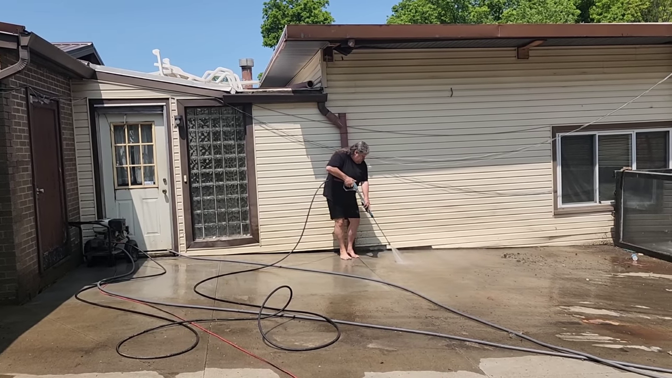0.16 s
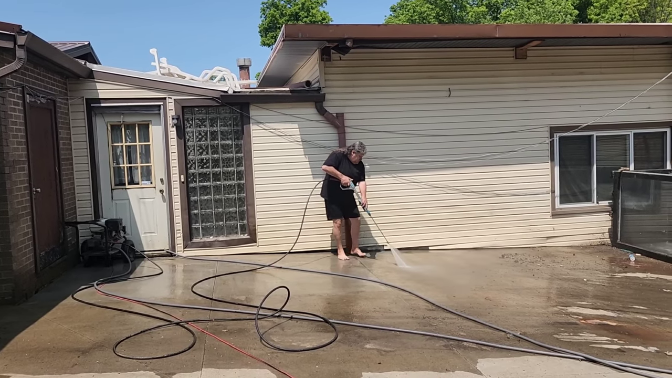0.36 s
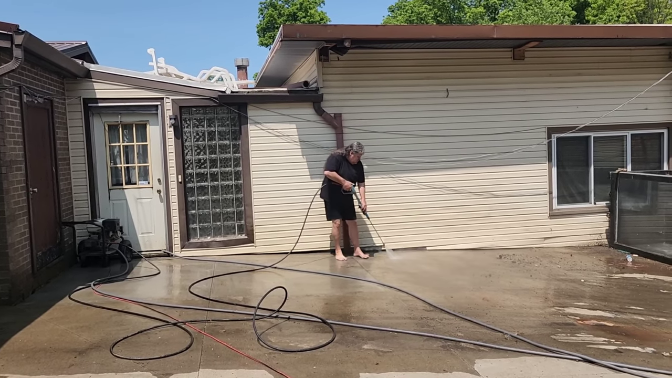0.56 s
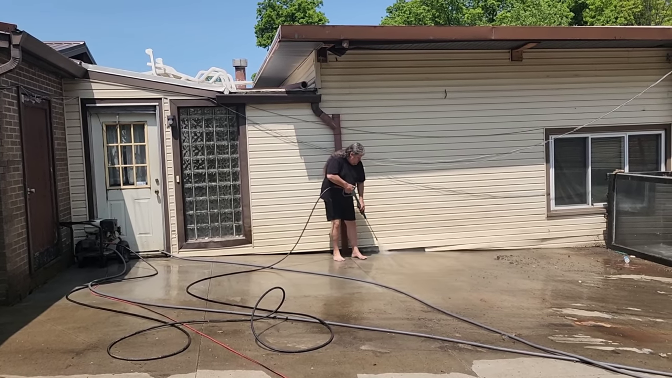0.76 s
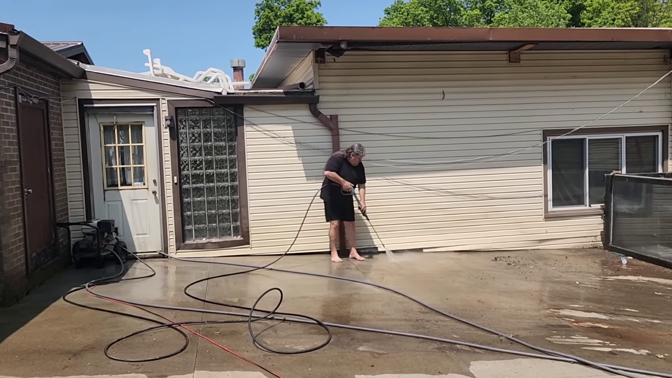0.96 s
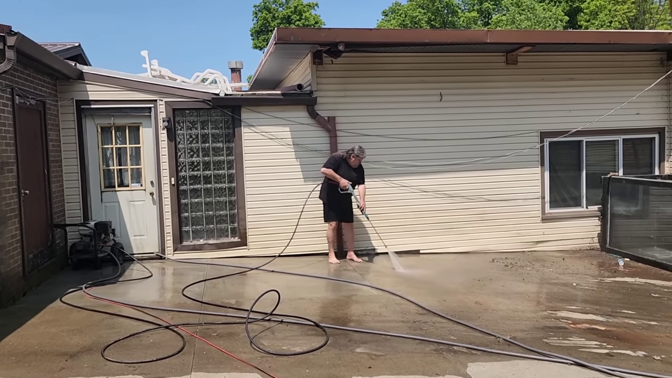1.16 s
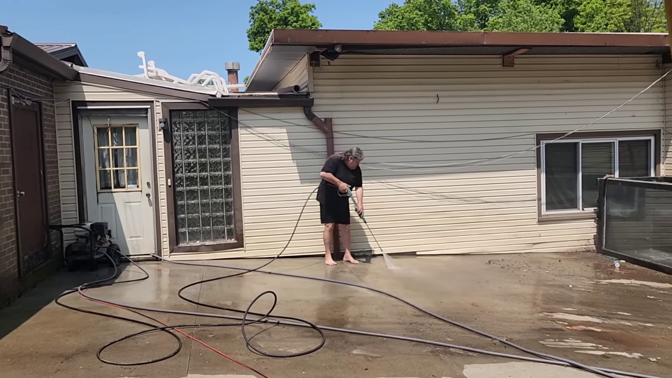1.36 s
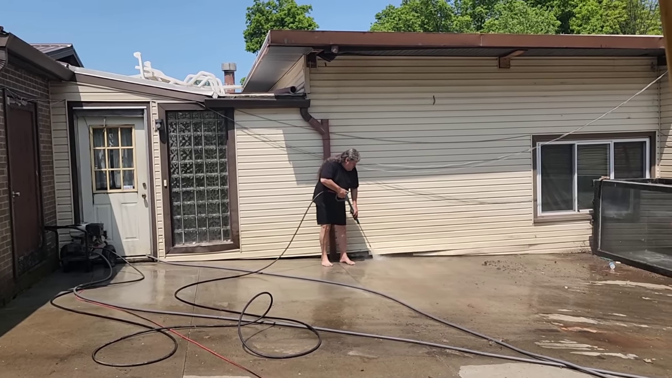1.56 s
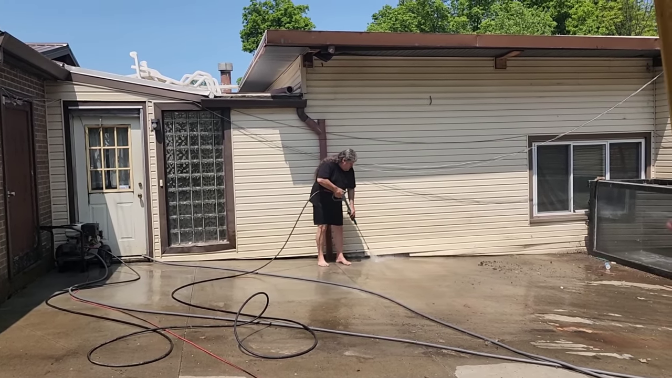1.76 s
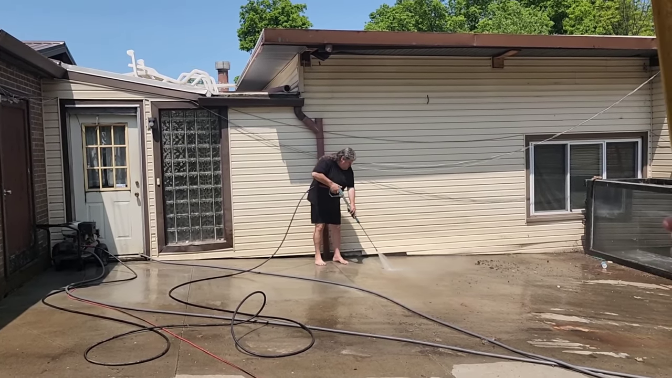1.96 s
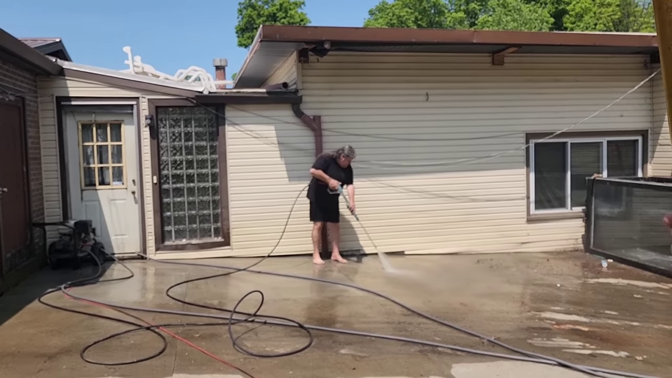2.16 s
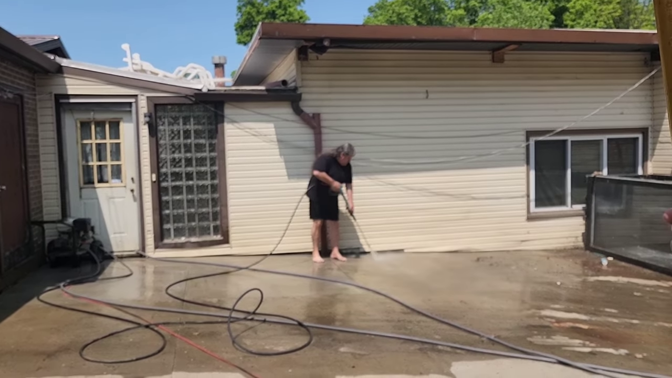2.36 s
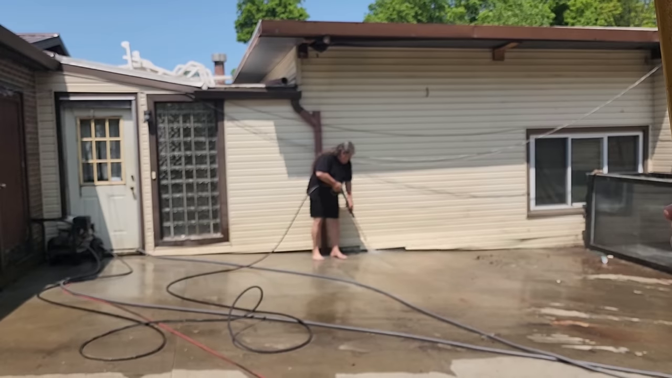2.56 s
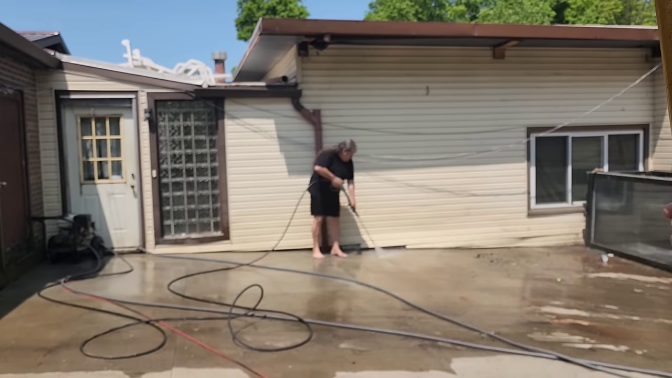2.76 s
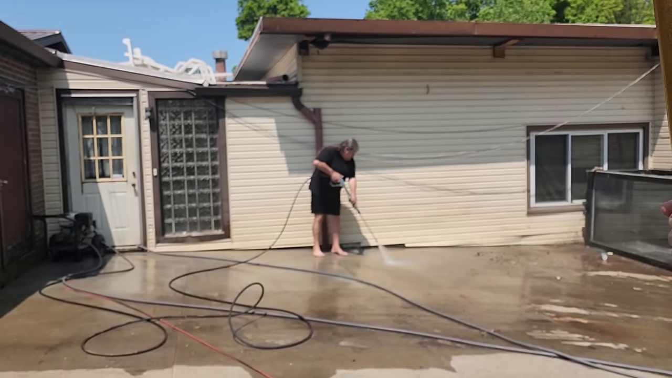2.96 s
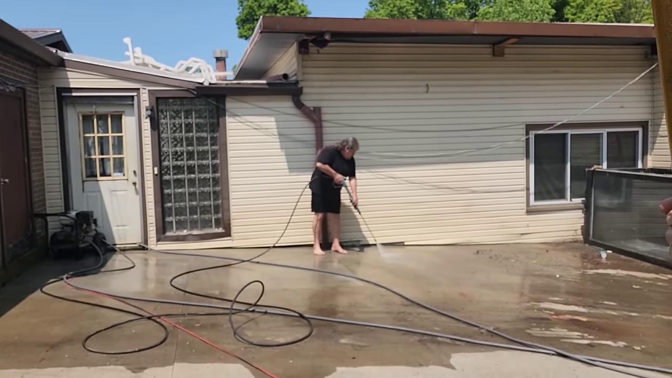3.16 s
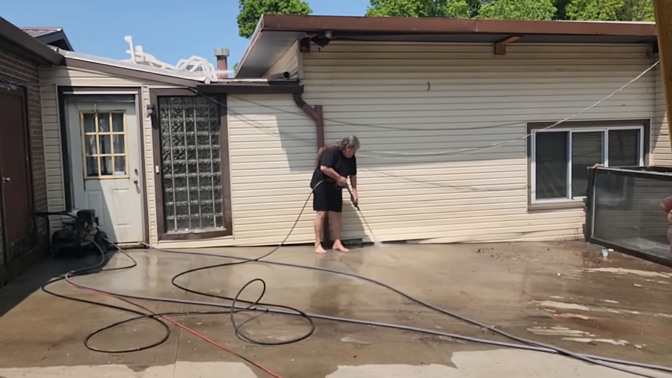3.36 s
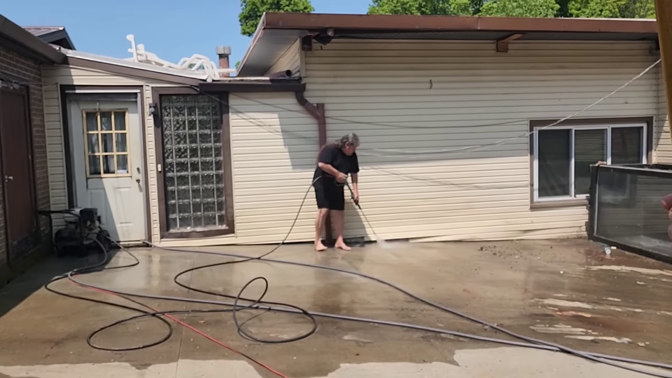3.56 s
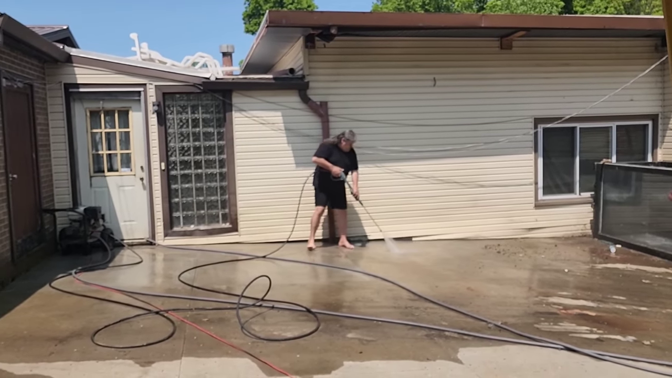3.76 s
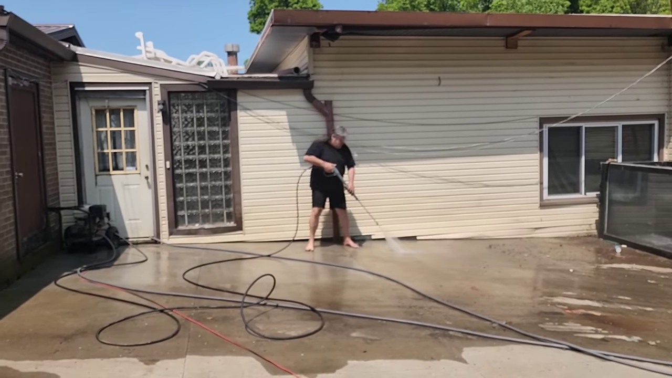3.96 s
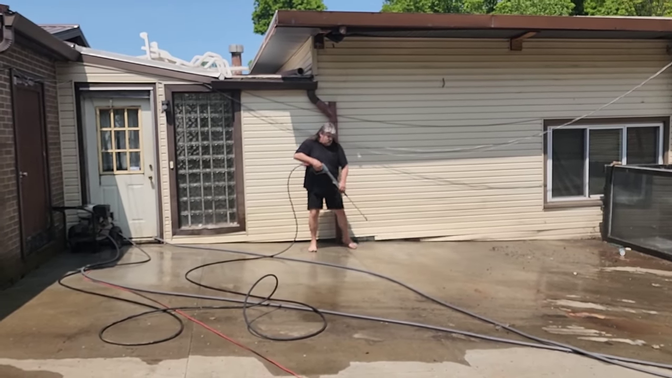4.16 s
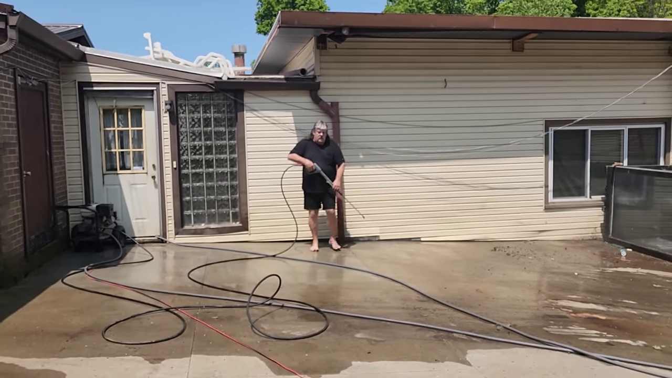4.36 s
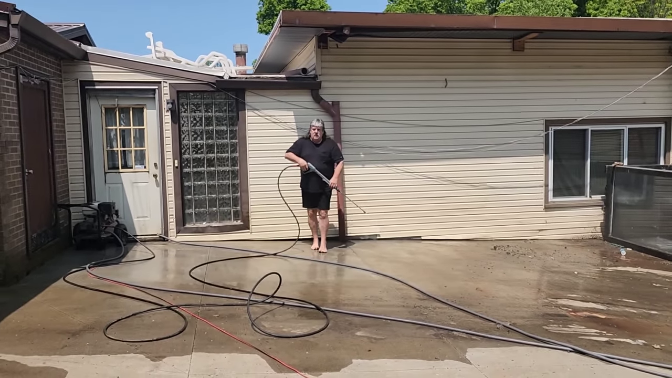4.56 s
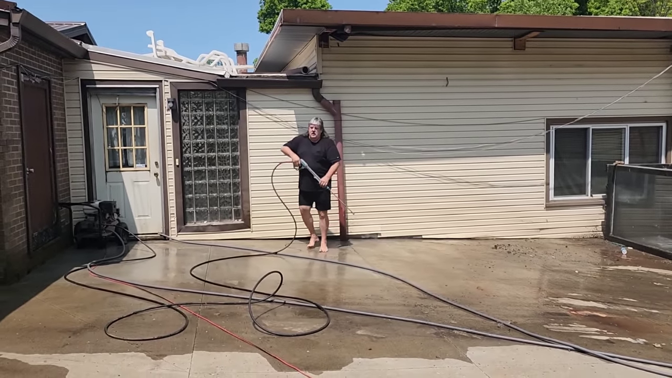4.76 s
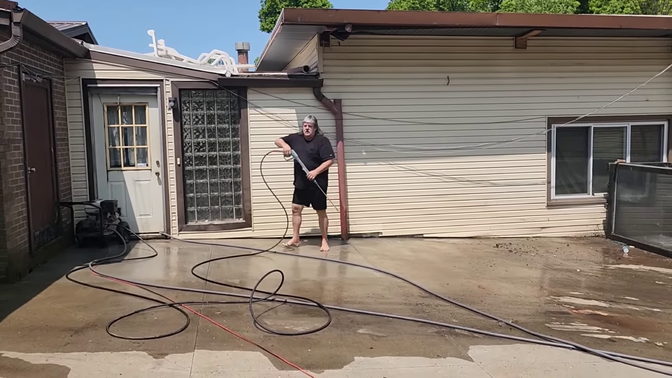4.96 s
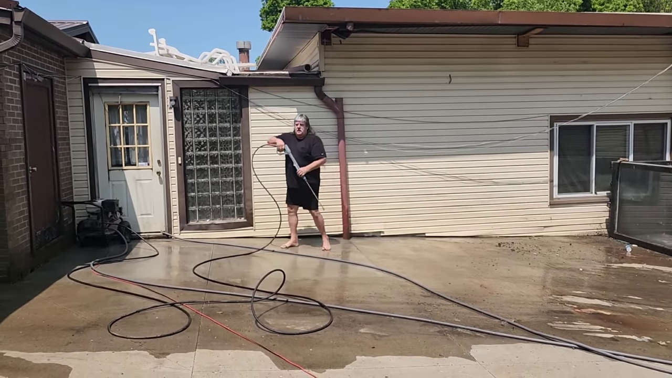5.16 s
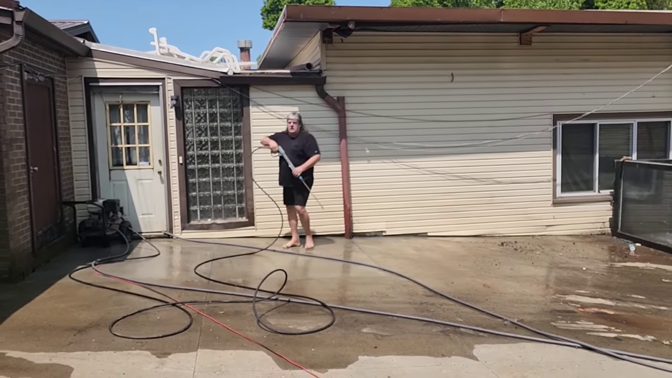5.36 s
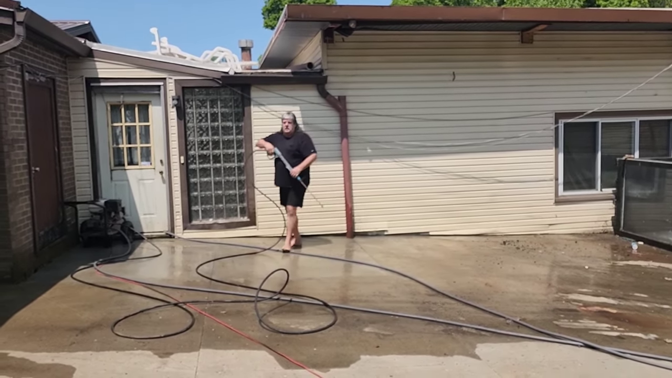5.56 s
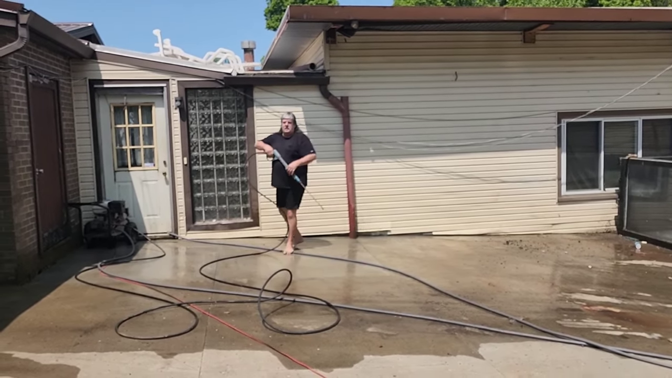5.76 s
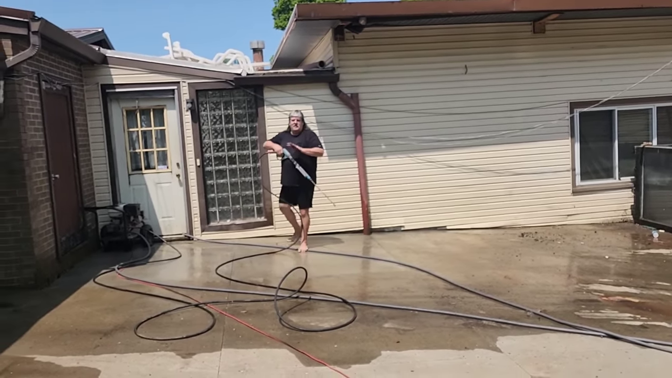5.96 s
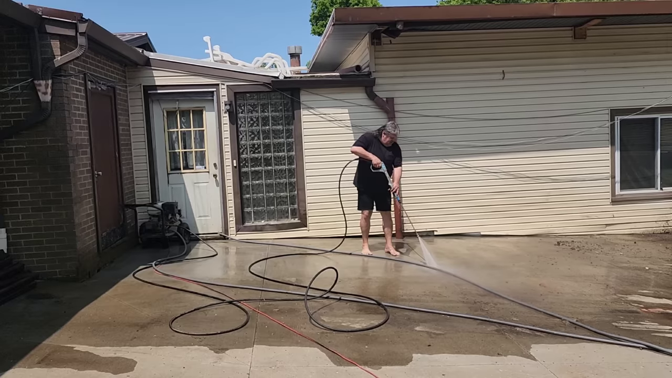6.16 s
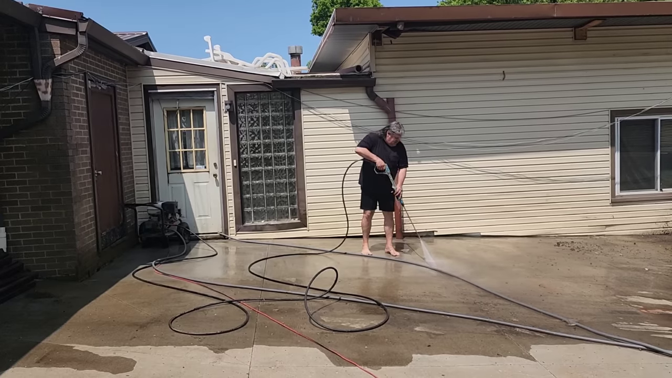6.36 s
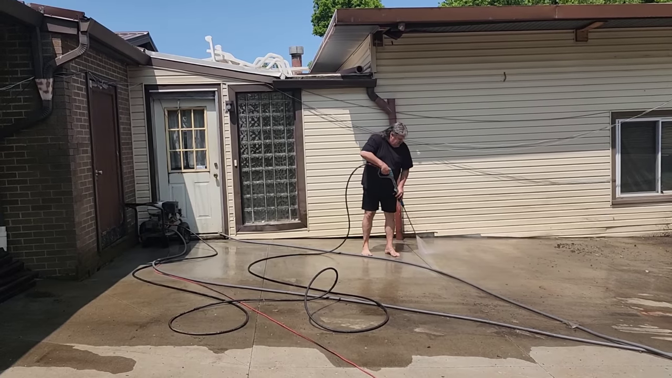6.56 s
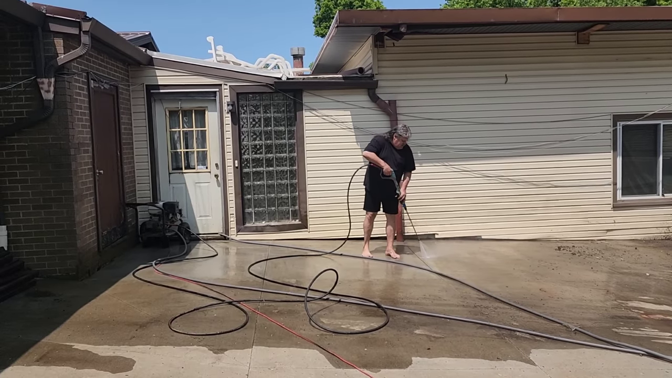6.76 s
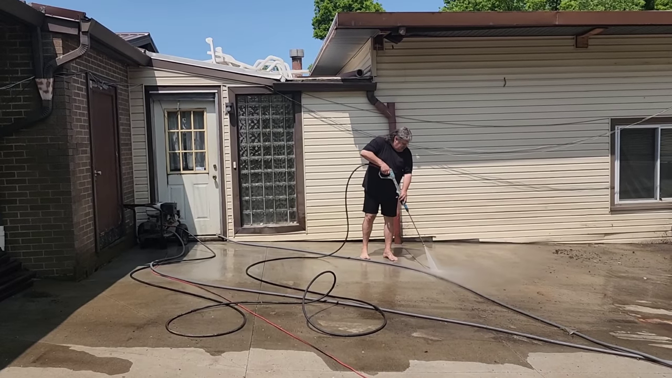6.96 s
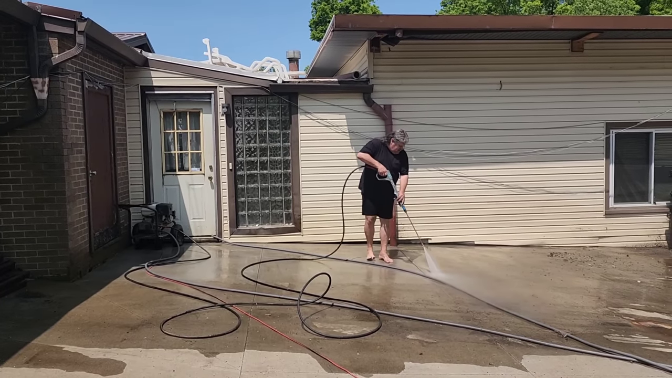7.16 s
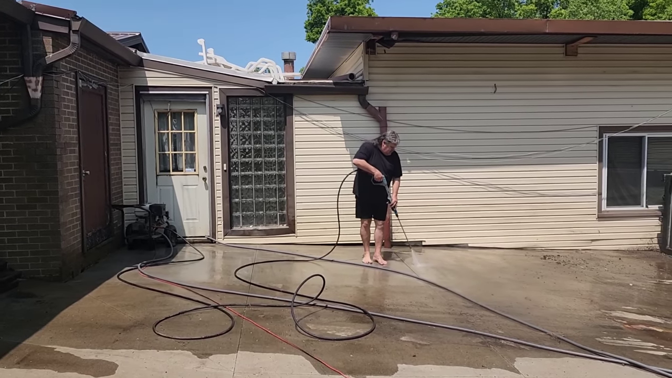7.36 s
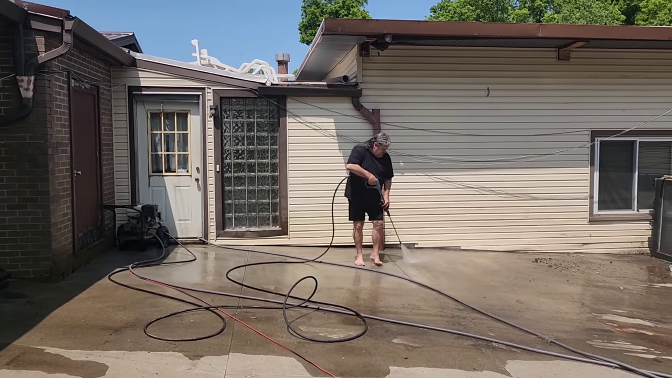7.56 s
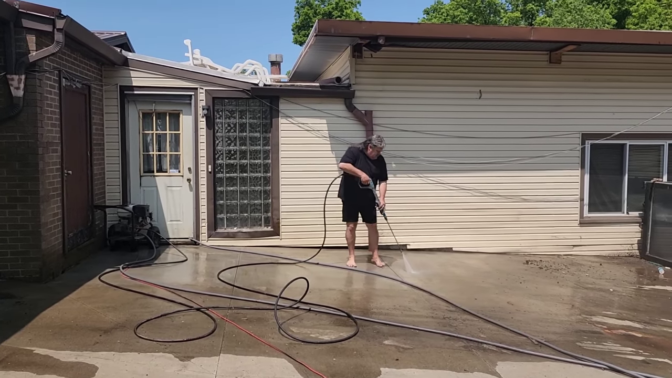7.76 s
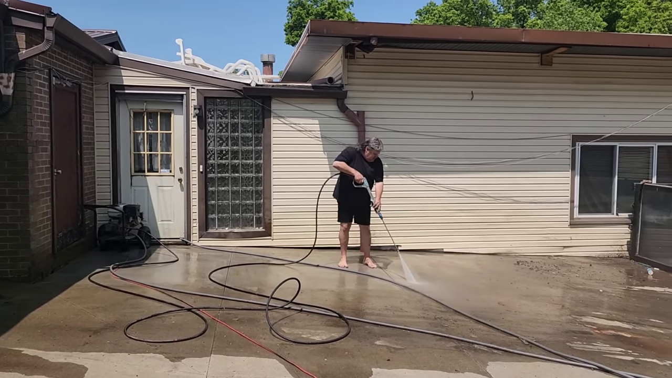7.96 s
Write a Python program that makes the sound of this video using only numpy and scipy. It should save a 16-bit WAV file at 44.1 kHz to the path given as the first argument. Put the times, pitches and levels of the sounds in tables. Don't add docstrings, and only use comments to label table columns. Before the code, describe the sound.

Steady engine drone and bright water spray on a patio; the spray stops, the engine hunts with popping exhaust, then after a tiny gap both return.

```python
import sys
import numpy as np
from scipy import signal
from scipy.io import wavfile
from scipy.ndimage import uniform_filter1d

SR = 44100
rng = np.random.default_rng(int(sys.argv[2]) if len(sys.argv) > 2 else 0)


def inscribe(sig):
    pcm = np.round(np.clip(np.atleast_2d(sig).T, -1, 1) * 32767)
    wavfile.write(sys.argv[1], SR, pcm.astype(np.int16))


def boost(x):
    u = np.asarray(x, float) / 20
    return 10 ** u


N = 353219
T = np.arange(N) / SR
STEP = 10
TRIGGER_OFF_S, CHANGE_S, BACK_S = 4.21, 6.033, 6.0762


def read(points, hz):
    f, value = np.transpose(points)
    return np.interp(np.log(hz + 1), np.log(f + 1), value)


def evened(x):
    return x / np.sqrt(np.mean(x ** 2) + 1e-20)


def drift(count, hz):
    knots = rng.standard_normal((int(N / SR * hz) + 2, count))
    at = np.arange(0, N, STEP) / SR * hz
    return np.array([np.interp(at, np.arange(len(k)), k) for k in knots.T]) * np.sqrt(3 / 2)


def bumps(times, width_s, sizes=1):
    hump = np.exp(-((T[::STEP, None] - np.asarray(times)) / width_s) ** 2) * sizes
    return np.repeat(hump.sum(1), STEP)[:N]


# f/Hz, likeness 0-1
LIKENESS = [(120, 1), (300, .95), (650, .8), (850, .4), (1400, .55), (2400, .4), (3300, .1), (4000, .55),
            (5000, .3), (8000, .3), (16000, .15)]
# f/Hz, lead/rad
LEAD = [(60, .04), (150, .13), (290, .55), (690, .75), (1290, 2.7), (1720, 3.3), (2330, 8.9), (3010, 9.6),
        (3530, 12.4), (5770, 12.6), (6890, 13.5), (7320, 15.8), (9130, 18.9), (12200, 17.3)]
# f/Hz, level/dB
TILT = [(60, -3), (600, 7), (770, -3), (1100, 2.5), (1300, 1.5), (2200, 5.5), (2900, 3), (3400, -7),
        (4500, 2.5), (5600, -0.5), (7400, 4.5), (8600, -4), (11000, -2.5), (12500, -8)]


def noise(spectrum, patchy_db, flicker_db, size, bright_db=None):
    frames, hz = 4 * N // size + 5, np.fft.rfftfreq(size, 1 / SR)
    a, b, c, d, patches = rng.standard_normal((frames, len(hz), 5)).T
    patches = uniform_filter1d(patches, size=size // 64, axis=0)
    patches = evened(uniform_filter1d(patches, size=8192 // size, axis=1))
    flicker = evened(uniform_filter1d(rng.standard_normal(frames), size=3))
    field_db = read(spectrum, hz)[:, None] + patchy_db * patches + flicker_db * flicker
    if bright_db is not None:
        at = np.minimum(np.arange(frames) * size // 4, N - 1)
        treble = np.clip(hz / 10000 - .7, -1, 1)[:, None]
        field_db = field_db + treble * bright_db[at]
    same = np.clip(read(LIKENESS, hz), 0, 1)[:, None]
    right = a + 1j * b
    left = same * right * np.exp(1j * read(LEAD, hz))[:, None] + np.sqrt(1 - same ** 2) * (c + 1j * d)
    tilt = boost(read(TILT, hz) / 2)[:, None]
    z = np.array([left * tilt, right / tilt]) * boost(field_db)
    out = signal.istft(z, nperseg=size, noverlap=3 * size // 4)[1][:, :N]
    return out / np.sqrt(np.mean(out.mean(0) ** 2))


LOAD_HZ = [28.667, 28.652]
# t/s, firings f/Hz
HUNT = [(4.2, 28.55), (4.28, 28.67), (4.44, 32.39), (4.6, 28.61), (4.68, 31.45), (4.76, 27.32),
        (4.84, 28.75), (4.92, 27.86), (5.08, 32.16), (5.24, 31.09), (5.34, 29.59), (5.48, 29.72),
        (5.56, 27.3), (5.64, 28.8), (5.72, 28.09), (5.82, 31.77), (6.033, 30.7)]


def speed():
    hunting = np.interp(T, *np.transpose(HUNT))
    return np.where(T < HUNT[0][0], LOAD_HZ[0], np.where(T > CHANGE_S, LOAD_HZ[1], hunting))


START_TURN = [0.2656, .63]


def cycle():
    turns, back = np.cumsum(speed()) / SR, round(BACK_S * SR)
    return np.r_[turns[:back] + START_TURN[0], turns[back:] - turns[back] + START_TURN[1]]


def flow():
    drain_s = .09
    return np.where(T > CHANGE_S, 1, np.clip(1 - (T - TRIGGER_OFF_S) / drain_s, 0, 1))


# from t/s, to t/s
THROTTLE = [
    (-1, 4.33),
    (4.905, 5.0),
    (5.66, 5.79),
    (6.06, 9),
]


def follow(part, jet_db):
    shut_db, open_db, lead, rise, lag, fall = part
    t, share = T[::STEP], 0
    for on, off in THROTTLE:
        rising = (t - on + lead) / rise + 1 if on < CHANGE_S else np.where(t > CHANGE_S, 1, 0)
        falling = 1 - (t - off - lag) / fall
        share = np.maximum(share, np.clip(np.minimum(rising, falling), 0, 1))
    level_db = shut_db + (open_db - shut_db) * share + jet_db * np.sqrt(flow()[::STEP])
    return np.repeat(level_db, STEP)[:N]


# shut level/dB, open level/dB, lead t/s, rise t/s, lag t/s, fall t/s
CRANK = (-23.5, -20, .0, .12, .0, .25)
THUD = (-26.5, -37, -.1, .1, .02, .08)
DRONE = (-34, -20, .0, .06, -.06, .1)
POP = (-31, -23, .08, .1, .01, .08)
JET_ADDS_DB = (1.5, -1, -1.5, -4, -3.3)
# t/s, strength 0-1
CATCH = [
    (4.66, .4),
    (5.41, 1),
]


def efforts():
    crank, thud, drone, pop = [follow(p, db) for p, db in zip((CRANK, THUD, DRONE, POP), JET_ADDS_DB)]
    at, size = np.transpose(CATCH)
    catch, late_catch = bumps(at, .05, size), bumps(at + .06, .05, size)
    shuts = np.array([off for on, off in THROTTLE[:3]])
    kick = bumps(shuts + .015, .06)
    starve = bumps(shuts + .19, .11)
    crack = bumps([on - .05 for on, off in THROTTLE[1:3]], .05)
    nearer_db = 1.2 * (T > CHANGE_S)
    return (crank + 4 * kick + 3.5 * catch, thud - 7 * late_catch, drone + nearer_db,
            pop + 3 * crack - 5 * starve + 1.5 * catch)


# multiple of the firing rate, level/dB
LOADED = [(1, -33), (2, 0), (3, -20), (4, -29), (5, -13.5), (6, -13.5), (7, -12), (8, -14), (9, -27.5),
          (10, -3), (11, -69), (12, -40), (13, -29.5), (14, -20), (15, -15), (16, -12.5), (17, -21),
          (18, -24), (19, -25), (20, -18), (21, -24), (22, -19), (23, -49), (24, -23.5), (25, -55),
          (26, -56), (27, -69), (28, -44)]
# f/Hz, level/dB
HARD = [(25, -14), (130, -12), (200, -6.5), (300, -5.5), (420, -1.5), (560, -9), (700, -23), (850, -29)]
# f/Hz, level/dB
IDLING = [(25, -17), (130, -6), (230, -11.5), (300, -8), (345, -9), (385, 9.5), (412, 10.5), (445, -4.5),
          (540, -15), (650, -20.5), (850, -51)]


def engine(turns):
    muffler_hz, muffler_width_hz = 286.5, 30
    wall_s, wall_share = .0105, .9
    pop_at = .1
    hz, crank_db, thud_db, drone_db, pop_db = np.array([speed(), *efforts()])[:, ::STEP]
    load = np.clip(boost(drone_db + 23), 0, 1)
    load *= .4 + .6 * np.clip(boost(spray()[0][::STEP] + 27), 0, 1)
    hard = np.clip((pop_db + 31) / 5, 0, 1)
    wander = drift(count=len(LOADED), hz=14.)
    shift = drift(count=len(LOADED), hz=9.8)
    out = np.zeros((2, len(hz)))
    for (k, db), w, s in zip(LOADED, wander, shift):
        bare_db = hard * read(HARD, k * hz) + (1 - hard) * read(IDLING, k * hz) - 6
        level_db = pop_db + load * (db + 8.0) + (1 - load) * bare_db
        special_db = {2: crank_db, 3: thud_db - 2.0, 4: thud_db - 3.5 - 6 * load, 10: pop_db - 9.5}
        level = boost(special_db.get(k, level_db))
        if k in (9, 10, 11):
            off_tune = 2 * (k * hz - muffler_hz) / muffler_width_hz
            level = np.hypot(level, boost(drone_db) / (1 + off_tune ** 4))
        strong = k in (2, 10)
        uneven_db = .4 if strong else .8 + .8 * (1 - load)
        slip = .03 if strong else .12 + .55 * (1 - load) * (1 - hard)
        echo = np.angle(1 + wall_share * (k < 10) * np.exp(-2j * np.pi * k * hz * wall_s))
        turned = np.pi * (k in (1, 11, 12, 21, 23, 25)) + 1.2 * (k == 6 or k > 17)
        bare = .6 + 1.8 * (4 < k < 10)
        pop = load * (echo + turned) + (1 - load) * bare - .8 - 2 * np.pi * k * pop_at
        angle = 2 * np.pi * k * turns[::STEP] + pop * (k != 2) + slip * s
        lead = read(LEAD, k * hz.mean()) / 2
        out += np.sqrt(2) * level * boost(uneven_db * w) * np.cos([angle + lead, angle - lead])
    return signal.resample_poly(out, STEP, 1, axis=1)[:, :N]


# t/s, added level/dB, added treble level/dB
SWEEPS = [(0, 2.5, -1), (.84, 3, -1), (1.63, 2, -.5), (2.45, 2, -1), (3.0, 1, 1), (3.56, 2, -2),
          (6.2, 2.5, 5), (7.13, 1.5, 7), (8.0, 2.5, 1)]


def spray():
    jet_db, dribble_db, dribble_bright_db, sweep_s = -24.9, -46, 8, .17
    at, db, bright_db = np.transpose(SWEEPS)
    level_db = dribble_db + (jet_db - dribble_db + bumps(at, sweep_s, db)) * flow()
    return level_db, bumps(at, sweep_s, bright_db) + dribble_bright_db * (1 - flow())


# f/Hz, level/dB per Hz
SPRAY = [(1410, -38), (2400, -16.5), (2950, -11.5), (3240, -6.5), (3990, -6.5), (4570, -7.5), (5440, -0.5),
         (6270, -2), (8280, -0.5), (9400, -11.5), (11300, 1), (12800, 1.5), (14900, 0), (15600, -2),
         (16000, -28.5)]
# f/Hz, level/dB per Hz
SPRAY_AFTER = [(1410, -38), (2400, -25), (3570, -8.5), (4150, -3.5), (5060, -8), (7350, 0.5), (8610, -8),
               (9860, -8.5), (11800, 0), (14800, -3), (15600, -6), (16000, -8)]


def jet():
    level_db, bright_db = spray()
    before = noise(SPRAY, patchy_db=0.52, flicker_db=-0.9, size=256, bright_db=bright_db)
    after = noise(SPRAY_AFTER, patchy_db=0.5, flicker_db=0.5, size=256, bright_db=bright_db)
    return boost(level_db) * np.where(T < CHANGE_S, before, after)


# shut level/dB, open level/dB, lead t/s, rise t/s, lag t/s, fall t/s
HISS = (-48, -29.5, .0, .015, -.015, .13)


def hiss():
    creep_db_per_s = 4
    open_db = follow(HISS, JET_ADDS_DB[-1])
    coasting_s = (T - THROTTLE[0][1]).clip(0) * (1 - flow())
    leak_db = HISS[0] + creep_db_per_s * coasting_s
    return 10 * np.log10(boost(2 * open_db) + (1 - flow()) * boost(2 * leak_db))


# f/Hz, level/dB per Hz
VALVE = [(700, -26), (1400, -2), (2100, -2.5), (2900, -7.5), (4300, -0.5), (5000, -5.5), (6500, -2.5),
         (8300, -3.5), (9400, -9.5), (11500, -1.5), (13200, -1.5), (15600, -9.5)]


def puffs(turns):
    puff_at = .765
    u = (turns - puff_at) % 1
    gate = np.minimum(u / .025, 1) * np.exp(-np.maximum(u - .15, 0) / .14) + .15
    size_db = 1.1 * rng.standard_normal(400)[(turns - puff_at + 1).astype(int)]
    return boost(hiss() + size_db) * evened(gate) * noise(VALVE, patchy_db=1.5, flicker_db=-1.0, size=256)


# f/Hz, width f/Hz, level/dB
SHROUD = [(770, 14, -47), (869, 12, -40.5), (1080, 20, -42), (1140, 22, -45), (1494, 12, -43.5),
          (2010, 25, -45), (2180, 25, -46), (2370, 30, -47)]


def shroud():
    race_db_per_hz = 4
    out = np.zeros((2, N))
    for mode_hz, width_hz, db in SHROUD:
        ring = signal.iirpeak(mode_hz, mode_hz / width_hz, SR)
        a, b = signal.lfilter(*ring, rng.standard_normal((2, N)))
        out += boost(db) * evened(np.array([a, .5 * a * np.cos(read(LEAD, mode_hz)) + 0.63 * b]))
    return out * boost(race_db_per_hz * np.clip(speed() - 30, -2, 1))


# f/Hz, level/dB per Hz
RATTLE = [(410, -35), (700, -10.5), (900, -5.5), (1000, -4), (1130, -3), (1270, -4), (1450, 0.5),
          (1750, -3), (2020, -3), (2250, -4.5), (2540, -8), (2900, -9.5), (3770, -28)]
# f/Hz, level/dB per Hz
FAN = [(1710, -38), (2900, -4.5), (3230, 0.5), (3570, -7), (4030, -2.5), (5100, -3.5), (5800, -4.5),
       (6140, -7), (8290, -4), (9030, -32), (9840, -13), (10600, -16), (13000, -4), (15200, -32),
       (16000, -32)]
# f/Hz, level/dB per Hz
RUMBLE = [(20, 0), (45, -4), (120, -3), (250, -2), (330, -3.5), (500, -11.5), (700, -4), (900, -24)]


def clatter():
    clatter_db, fan_db, rumble_db, nearer_db = -32.3, -5, -30.5, 1.2
    slack_db, slack_s = -4.5, .4
    slack = (1 - flow()) * np.clip(1 - ((T - TRIGGER_OFF_S - .2) / slack_s) ** 2, 0, 1)
    level_db = clatter_db + slack_db * slack + nearer_db * (T > CHANGE_S)
    metal = noise(RATTLE, patchy_db=1.5, flicker_db=0.3, size=1024)
    air = boost(fan_db) * noise(FAN, patchy_db=1.5, flicker_db=-0.4, size=256)
    rumble = boost(rumble_db) * noise(RUMBLE, patchy_db=0.5, flicker_db=-0.3, size=2048)
    return boost(level_db) * (metal + air) + rumble


def scene():
    turns = cycle()
    return engine(turns) + jet() + puffs(turns) + shroud() + clatter()


def roll_off(x):
    return signal.sosfilt(signal.butter(12, 16750, fs=SR, output="sos"), x)


def record(dry):
    edge_hz = 15520
    remnant = boost(-29 - 500 * (T - CHANGE_S).clip(0) - 60 * (T > CHANGE_S + .012))
    keep = np.where((T > CHANGE_S) & (T < BACK_S), remnant, 1)
    edge = signal.firwin(401, edge_hz, window=("kaiser", 9), fs=SR)[None]
    mix = signal.oaconvolve(dry * uniform_filter1d(keep, size=30), edge, "same")
    return roll_off(mix)


dry = scene()
out = record(dry)
inscribe(out)
```